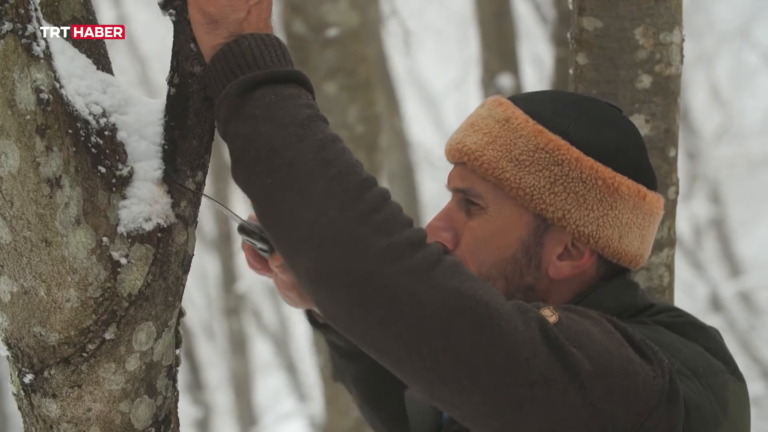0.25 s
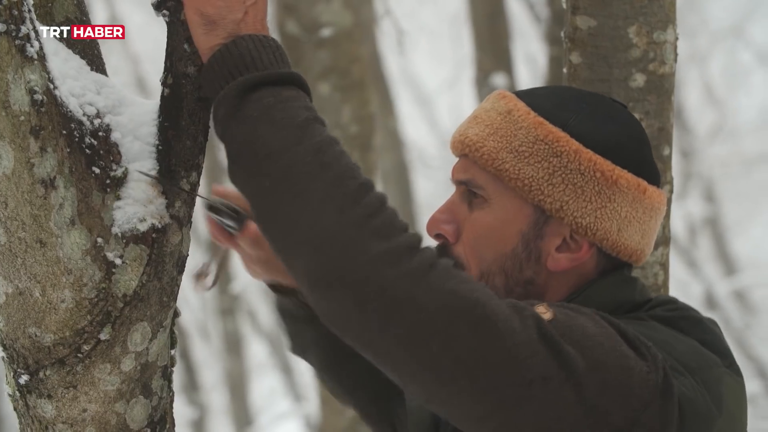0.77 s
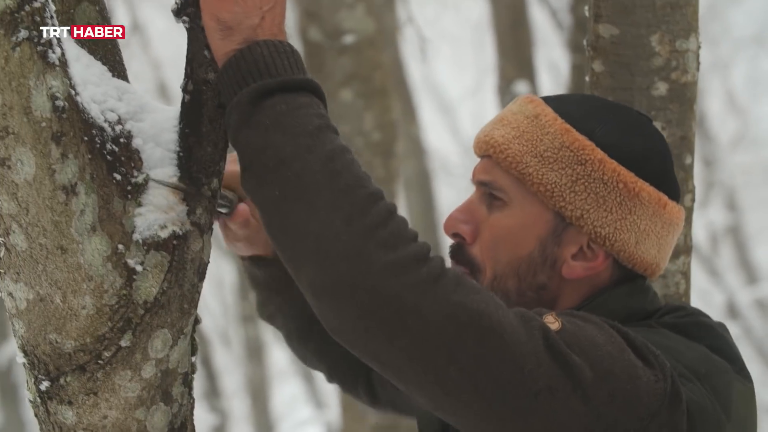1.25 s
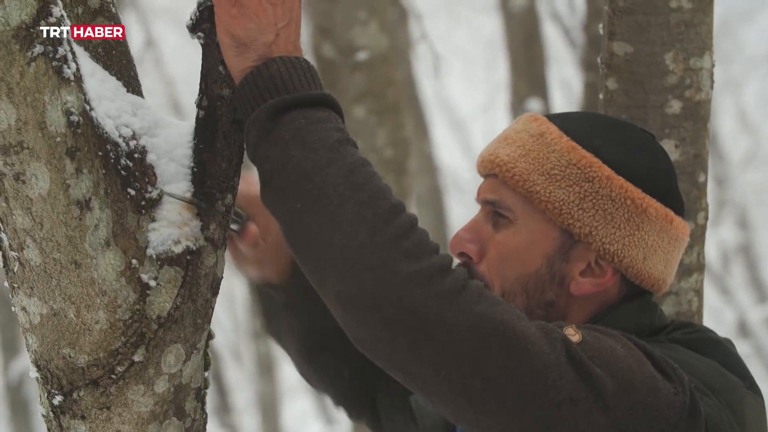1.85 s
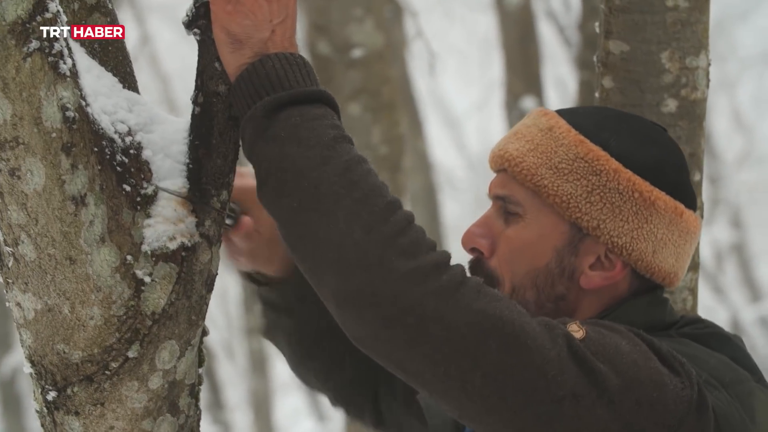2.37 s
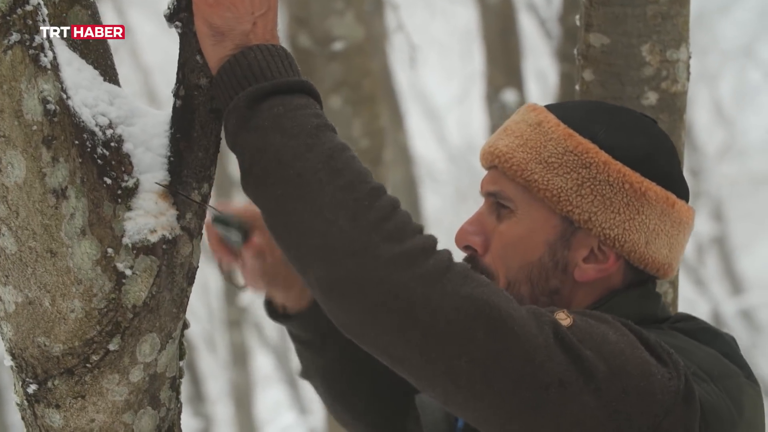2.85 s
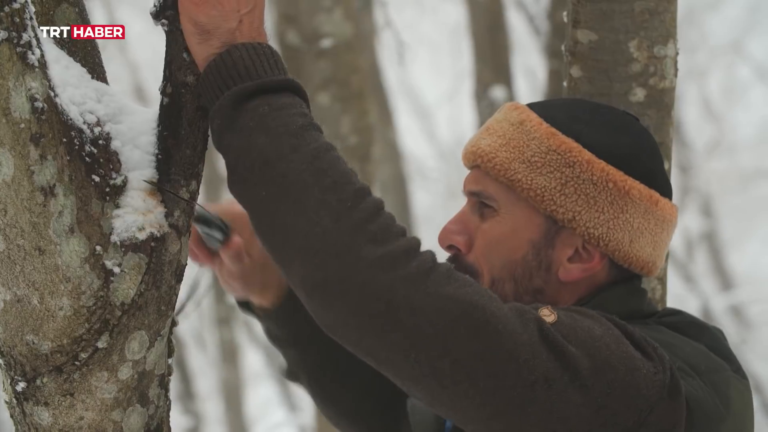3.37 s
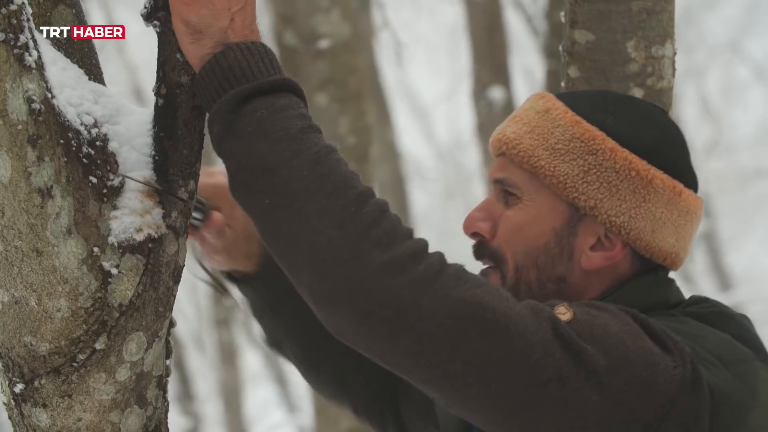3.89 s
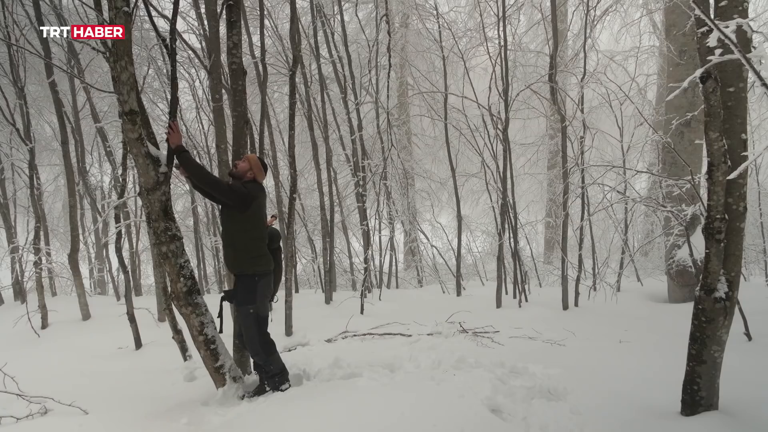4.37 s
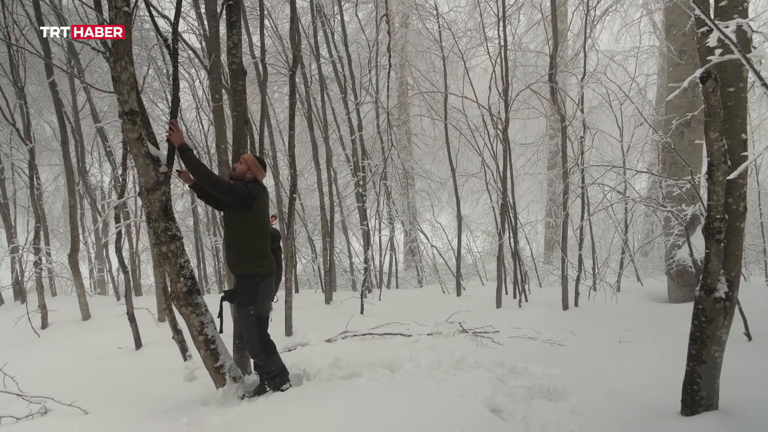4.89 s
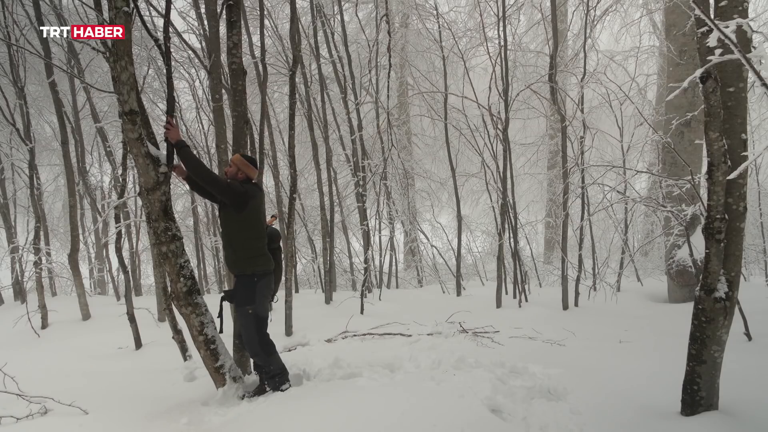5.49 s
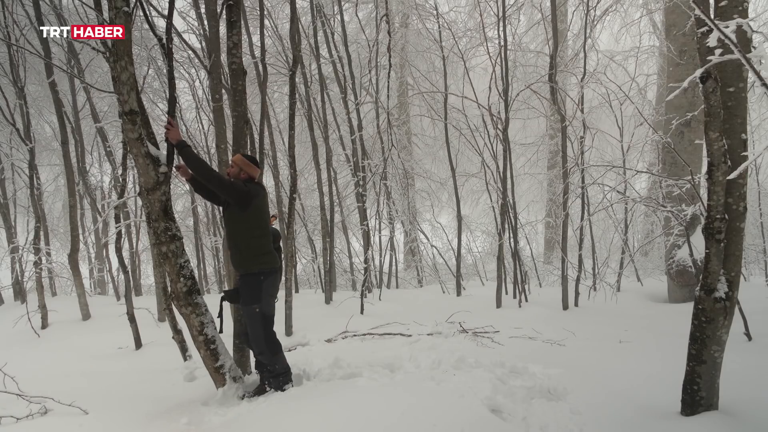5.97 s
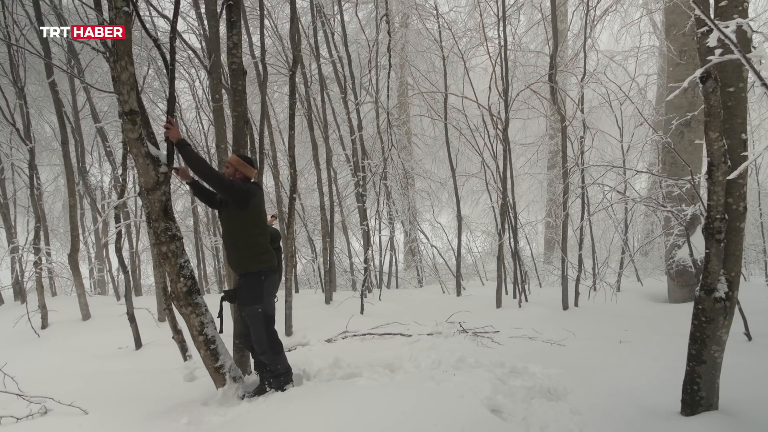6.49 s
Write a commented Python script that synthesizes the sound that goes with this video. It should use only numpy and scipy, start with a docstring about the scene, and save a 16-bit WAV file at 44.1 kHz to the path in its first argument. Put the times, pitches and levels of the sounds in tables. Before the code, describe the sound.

Close and dry in a hushed snowy forest, a folding hand saw is already cutting a dead branch at 0 s, about seven strokes a second. Each stroke swells and brakes in a gritty, toothy rasp; pushes are brighter, pulls bring out more of the hollow branch and trunk. Snaps and a dull knock come at 0.1-0.2 s. Short singing blade tones climb higher after 1.4 s, and soft knocks recur. Around 3.1-3.7 s strokes grow stronger, with sharp cracks and a brief throaty groan at 3.4 s as the blade binds. Sawing fades by 4.3 s into sleeve rustle, light knocks and ticks. At 5.2-5.7 s a knock cluster and bright scratch accompany four lighter, duller strokes. Another rustling pause has small snaps and knocks, then faint strokes from 6.4 s and a hard crack near 6.7 s. Air stays barely audible, without echo.

```python
"""A folding hand saw cuts a dead branch over a faint air floor and rubbing sleeves, dry and close.
From the start about seven strokes a second: teeth tear fibres at a rate set by blade speed, which rings
blade, branch and trunk, the trunk more on the pull. The blade sings, fibres snap, the hand knocks the wood.
Past 3 s the blade binds once and groans. Two pauses follow, with knocks, snaps and rustle, each ended by
a few lighter, duller strokes."""
import sys
import numpy as np
from scipy import signal
from scipy.fft import rfft, irfft
from scipy.io import wavfile
from scipy.ndimage import uniform_filter1d

SR = 44100
rng = np.random.default_rng(int(sys.argv[2]) if len(sys.argv) > 2 else 0)


def transcribe(u):
    """Save the signal u as a 16-bit wav file named by the first command-line argument.

    u: samples, shape (n,) or (channels, n), limited to [-1, 1]; the rate is SR.
    q: integer samples, one column per channel.
    """
    v = np.clip(np.atleast_2d(u).T, -1, 1)
    q = np.round(v * 32767).astype(np.int16)
    wavfile.write(sys.argv[1], SR, q)


N = 297234

# Low resonances of the shaken wood. Each row: centre in Hz, width in Hz, relative level in dB.
RUMBLE = [(60.6, 137, -2.5), (140, 46, 3.5)]


def amp(db):
    """dB to gain."""
    return 10 ** (np.asarray(db) / 20)


def rms_one(x):
    """Scale to unit rms."""
    return x / np.sqrt(np.mean(x ** 2) + 1e-20)


def in_time(rows):
    """Columns of a curve (time in s first), one value a sample."""
    s, *columns = np.transpose(rows)
    return [np.interp(np.arange(N) / SR, s, column) for column in columns]


def drift(rate_hz):
    """Slow random curve of unit rms: noise through two equal poles at a 20th of the sample rate."""
    r = np.exp(-40 * np.pi * rate_hz / SR)
    noise = rng.standard_normal(N // 20 + 2002)
    slow = signal.lfilter([1], [1, -2 * r, r * r], noise)[2000:]  # settled part
    return np.interp(np.arange(N) / 20, np.arange(len(slow)), rms_one(slow))


def resonance(x, hz, width_hz):
    """Two-pole peak with gain 1 on top."""
    r = np.exp(-np.pi * width_hz / SR)
    zeros = [(1 - r * r) / 2, 0, (r * r - 1) / 2]
    poles = [1, -2 * r * np.cos(2 * np.pi * hz / SR), r * r]
    return signal.lfilter(zeros, poles, x + 1e-18)


def body(x, modes, patchy_db=0):
    """Modes in parallel, signs alternating, each wavering on its own as the contact moves."""
    out = 0
    for k, (hz, width_hz, db) in enumerate(modes):
        gain = amp(db + patchy_db * drift(18.4))
        out = out + (-1) ** k * gain * resonance(x, hz, width_hz)
    return out


def grains(per_s, spread_db, hiss):
    """Random clicks of uneven size on a bed of finer tearing, power evened against the rate."""
    sizes = amp(spread_db * np.minimum(rng.exponential(1, N), 3)) * rng.choice([-1, 1], N)
    clicks = rms_one(sizes) * (rng.random(N) < per_s / SR) * np.sqrt(SR / per_s)
    return clicks + hiss * rng.standard_normal(N)


def bent(x, depth, rate_hz):
    """Pitch wanders by a small share as the grip on the wood shifts."""
    pace = 1 + depth * drift(rate_hz)
    shift_samples = np.cumsum(pace - uniform_filter1d(pace, size=8000))
    return np.interp(np.arange(N) + shift_samples, np.arange(N), x)


def air():
    """Steady faint floor: noise shaped by a curve over log frequency."""
    # Each row: frequency in Hz, relative level in dB.
    spectrum = [(25, -23), (130, -1.5), (500, 10), (900, 0), (2000, -12), (6000, -18), (11000, -30),
                (15000, -3)]
    at_hz, db = np.transpose(spectrum)
    hz = np.fft.rfftfreq(N, 1 / SR) + 1  # +1 keeps the log finite
    gain = amp(np.interp(np.log(hz), np.log(at_hz), db))
    return amp(-72) * rms_one(irfft(rfft(rng.standard_normal(N)) * gain, N))


def rustle():
    """Sleeves and bark: crumbly rub of clumped grains, fine bright scratch, low rumble of shaken wood."""
    # Each row: time in seconds, dull rub in dB, bright scratch in dB before flicker, rumble in dB.
    rub_levels = [(0, -62.5, -68, -63), (.23, -57, -65.5, -65.5), (.56, -61, -67, -69.5),
                  (3.3, -59.5, -69, -69), (3.63, -52.5, -64, -69), (3.8, -58, -68, -73),
                  (4.3, -57.5, -71, -78), (4.37, -62.5, -71.5, -75), (4.66, -61, -70.5, -74),
                  (4.78, -71, -73, -90), (5.11, -64, -69.5, -90), (5.17, -59, -67, -81),
                  (5.284, -47.5, -86, -65), (5.37, -57, -51.5, -66), (5.45, -59.5, -68.5, -79),
                  (5.74, -58.5, -72.5, -73), (5.78, -65, -67, -70), (5.85, -60, -68.5, -76),
                  (6.05, -60.5, -69.5, -74), (6.13, -58, -69, -72), (6.25, -62.5, -70, -70),
                  (6.62, -62.5, -71, -75)]
    # Each row: centre in Hz, width in Hz, relative level in dB.
    sleeve_modes = [(196, 226, -4.5), (374, 290, -1), (528, 290, -1.5), (940, 670, -6), (1350, 2100, -10)]
    dull_db, bright_db, rumble_db = in_time(rub_levels)

    crumbs = grains(250 * amp(3 * drift(12)), spread_db=3.5, hiss=1.8) * amp(1.5 * drift(20))
    soft_crumbs = signal.lfilter([.2], [1, -.8], crumbs)
    dull = rms_one(body(soft_crumbs, sleeve_modes, 2.1)) * amp(dull_db)

    specks = grains(120, spread_db=6.0, hiss=3.0)
    flicker_db = 1.0 * drift(30)
    bright_band = signal.butter(2, [2000, 10500], "band", fs=SR, output="sos")
    bright = rms_one(signal.sosfilt(bright_band, specks)) * amp(bright_db + flicker_db)

    rumble = rms_one(body(rng.standard_normal(N), RUMBLE, 1.2)) * amp(rumble_db)
    return dull + bright + rumble


def saw():
    """Each stroke speeds up and brakes; pressure follows speed, steeply for the blade, gently for the wood."""
    # Push and pull in turn. Each row: top speed at in seconds, rise in s, fall in s,
    # blade level in dB before trim and crest, branch ring relative to blade in dB.
    strokes = [(0.025, 0.17, 0.04, -49.5, 0.5), (0.157, 0.089, 0.033, -45, -1),
               (0.298, 0.1, 0.056, -46, -2.5), (0.433, 0.081, 0.049, -46, -3),
               (0.581, 0.087, 0.045, -49.5, -1), (0.718, 0.083, 0.046, -47.5, 0.5),
               (0.88, 0.1, 0.039, -48.5, -0.5), (1.005, 0.082, 0.048, -47.5, 1),
               (1.159, 0.11, 0.034, -48, 0), (1.293, 0.089, 0.043, -45, -1.5),
               (1.448, 0.1, 0.044, -45.5, -1.3), (1.576, 0.072, 0.058, -42.5, -1.2),
               (1.739, 0.095, 0.039, -47.5, 2.5), (1.864, 0.074, 0.045, -45, -1),
               (2.017, 0.096, 0.038, -45.5, 0.5), (2.147, 0.079, 0.053, -44, -0.9),
               (2.305, 0.082, 0.04, -45.5, 0.5), (2.421, 0.057, 0.06, -45, -0.5),
               (2.583, 0.087, 0.047, -44.5, -1.5), (2.711, 0.073, 0.061, -45, 0.5),
               (2.884, 0.094, 0.027, -45, -1), (3.004, 0.075, 0.049, -45, 1),
               (3.171, 0.11, 0.023, -46, 0.1), (3.296, 0.094, 0.038, -44.5, -1),
               (3.45, 0.088, 0.027, -46, 0.1), (3.577, 0.077, 0.04, -40, -2.5),
               (3.719, 0.058, 0.054, -43.5, -0.5), (3.864, 0.081, 0.051, -41.5, -1),
               (4.003, 0.069, 0.045, -46, -2), (4.155, 0.076, 0.055, -52.5, -2),
               (4.28, 0.048, 0.088, -58.5, 0), (5.255, 0.091, 0.024, -47, -11.5),
               (5.402, 0.19, 0.034, -52, -1), (5.561, 0.1, 0.05, -46.5, -6.5),
               (5.683, 0.074, 0.043, -47.5, -6.5), (6.385, 0.061, 0.12, -57.5, -12.5),
               (6.586, 0.18, 0.041, -61.5, -0.7), (6.654, 0.02, 0.11, -51.5, -6.5)]
    # Resonances of each part. Each row: centre in Hz, width in Hz, relative level in dB.
    blade_modes = [(1850, 100, -10), (2763, 446, 6.5), (3594, 970, 10.5), (4620, 2070, 8.5)]
    edge_modes = [(6840, 960, 6.94), (7800, 1380, 1)]
    branch_modes = [(1234, 173, -4), (1409, 100, -1.5), (1533, 72, 3.5), (1642, 140, -4.5),
                    (1850, 114, -8.5)]
    trunk_modes = [(336, 17, 0.5), (484, 133, -3), (690, 132, -1), (791, 51, 2), (980, 147, -3)]
    sawdust_modes = [(10220, 2600, -9.5), (10990, 1350, -5), (12900, 5500, -17)]

    # (push, pull): trunk and rumble relative to branch ring; branch swell over one stroke length
    trunk_rel_db, rumble_rel_db, branch_swell_db = (-10.5, -4), (-26, -17.5), (-4.5, 14)
    branch_steepness = (0.86, 1.0)  # the branch catches at once on the push
    edge_rel_db, dust_rel_db = -2.5, -6.5  # relative to blade, before trims
    dust_follows, mean_stroke_db = 0.79, -45  # hiss takes this share of the stroke-to-stroke swing
    # after the first pause the strokes are lighter and duller
    late_s, late_edge_db, late_dust_db, late_trunk_db, late_swell_share = 4.5, -3, -5.5, 8, 0

    # rows of all six: blade, edge, branch, trunk, sawdust, rumble
    steepness = np.array([[1.3], [1.3], [0], [1.05], [1.3], [1.05]])  # branch set per stroke
    crest_db = np.array([[5.0], [5.0], [1.5], [2.5], [4.0], [2.5]])  # bite lost away from top speed
    trims_db = [1.08, 2.3, 0.11, 0.25, 1.8, 0]

    t, speed, levels = np.arange(N) / SR, np.zeros(N), np.zeros((6, N))
    for k, (s, rise_s, fall_s, blade_db, wood_db) in enumerate(strokes):
        pull, late = k % 2, s > late_s
        now = slice(max(int((s - rise_s) * SR), 0), int((s + fall_s) * SR))
        since = t[now] - s
        away = np.clip(np.where(since < 0, -since / rise_s, since / fall_s), 0, 1)
        stroke = np.cos(np.pi / 2 * away)
        speed[now] = np.maximum(speed[now], stroke)

        edge_db = edge_rel_db + late * late_edge_db
        trunk_db = wood_db + trunk_rel_db[pull] + late * late_trunk_db
        dust_db = dust_rel_db + (dust_follows - 1) * (blade_db - mean_stroke_db) + late * late_dust_db
        rumble_db = wood_db + rumble_rel_db[pull]
        relative_db = np.array([0, edge_db, wood_db, trunk_db, dust_db, rumble_db])[:, None]

        steepness[2] = branch_steepness[pull]
        shapes = amp(blade_db + relative_db - crest_db * away) * stroke ** steepness
        swell_db = branch_swell_db[pull] * (late_swell_share if late else 1)
        shapes[2] *= amp(swell_db * (since + 0.018) / (rise_s + fall_s))
        levels[:, now] += shapes

    bites = grains(900 * (0.41 + speed), spread_db=3.0, hiss=1.61)  # 369 to 1269 bites a second
    chatter = amp(1.05 * drift(54))  # the teeth dig in unevenly
    branch = bent(body(bites, branch_modes, 1.5), depth=.03, rate_hz=8)
    blade = body(bites, blade_modes, 1.2)
    edge = body(bites, edge_modes, 1.63)
    trunk = body(bites, trunk_modes, 1.5)
    sawdust = body(bites, sawdust_modes, 1.35)
    rumble = body(bites, RUMBLE, 1.1)
    parts = [blade, edge, branch, trunk, sawdust, rumble]
    return chatter * sum(amp(db) * level * rms_one(part) for db, level, part in zip(trims_db, levels, parts))


def singing():
    """Narrow band of tearing noise whose centre glides up as the free length of blade shortens."""
    # Each row: loudest at in seconds, half the span in s, middle pitch in Hz, level in dB before the swell shape.
    notes = [(0.028, 0.034, 2750, -53), (0.309, 0.027, 2800, -53), (0.588, 0.025, 2800, -50),
             (0.886, 0.018, 2750, -47.5), (1.166, .02, 2790, -52), (1.427, 0.068, 4670, -53),
             (1.718, 0.036, 4940, -46.5), (2.004, 0.058, 4070, -50), (2.299, 0.041, 5080, -46.5),
             (2.575, 0.058, 5350, -49), (2.873, 0.038, 5240, -42.5), (3.153, 0.031, 5300, -43.5),
             (3.432, 0.052, 4800, -44.5), (3.56, 0.061, 3590, -48), (3.715, 0.051, 4840, -45.5),
             (3.849, 0.059, 3600, -44.5), (4.297, 0.048, 6000, -63), (5.24, 0.05, 3890, -56),
             (5.374, 0.059, 5100, -54.5), (5.548, 0.059, 3450, -49), (5.674, 0.041, 5750, -50),
             (6.382, 0.066, 3870, -66), (6.665, 0.041, 3780, -51)]
    rise_per_s, pole_width = 1.3, 0.18  # shares of the pitch
    out = np.zeros(N)
    for s, length_s, hz, db in notes:
        u = np.arange(int(2 * length_s * SR)) / (2 * length_s * SR)
        r = np.exp(-np.pi * pole_width * hz / SR)
        noise = rng.standard_normal((2, 16000))
        sway = signal.lfilter([1], [1, -2 * r, r * r], noise)[:, 500:500 + len(u)]
        glide_hz = hz * (1 + rise_per_s * length_s * np.clip(2 * u - 1, -.5, .5))
        phase = 2 * np.pi * np.cumsum(glide_hz) / SR
        tone = rms_one(sway[0] * np.cos(phase) + sway[1] * np.sin(phase))
        start = max(int((s - length_s) * SR), 0)
        out[start:start + len(u)] += amp(db) * np.sin(np.pi * u) ** 2 * tone
    return out


def snaps():
    """Dry fibres snap: a millisecond of crackle, brightest at its own pitch, with a short branch ring."""
    # Each row: start in seconds, crack peak in dB, branch ring relative to crack in dB, brightest in Hz.
    cracks = [(0.085, -36, -15, 6440), (0.175, -33, -1, 4280), (0.2012, -29, -8, 4300),
              (3.0614, -51, -12, 7250), (3.0732, -29, -13, 4500), (3.3317, -26.5, -16, 4800),
              (3.358, -40, -6, 4430), (3.619, -32.5, -19, 5810), (3.6441, -47, -11, 4110),
              (3.6622, -26, 4.5, 4500), (4.4216, -46, -21, 3950), (4.7366, -52.5, 2, 5630),
              (4.893, -45.5, -28, 2680), (5.139, -47, 1, 3020), (5.155, -41.5, -15, 4700),
              (5.741, -40.5, -26, 7600), (5.9692, -41, -26, 4400), (5.9814, -43, -19, 6380),
              (6.005, -51, -11, 2790), (6.209, -49, -32, 2810), (6.6497, -40, -13, 4210),
              (6.6768, -24, -7.5, 3840), (6.6803, -37, 0, 3900), (6.706, -35, -27, 4470)]
    length = 600
    out, t = np.zeros(N + length), np.arange(length) / SR
    broad = signal.butter(2, [1500, 14000], "band", fs=SR, output="sos")
    noises = rng.standard_normal((len(cracks), length))
    for (s, db, ring_db, hz), noise in zip(cracks, noises):
        burst = noise * np.minimum(t / .0007, 1) * np.exp(-t / .001)
        crack = signal.sosfilt(broad, burst) * amp(-10) + resonance(burst, hz, 2500)
        ring = resonance(burst, 1510, 1000)
        snap = crack / np.abs(crack).max() + amp(ring_db) * ring / np.abs(ring).max()
        start = int(s * SR)
        out[start:start + length] += amp(db) * snap
    return out[:N]


def knocks():
    """Soft dull blows on the wood: about one cycle at their own pitch, with a short dying tail."""
    # Each row: envelope peak at in seconds, envelope peak in dB, pitch in Hz.
    blows = [(0.1756, -27.5, 523), (1.328, -36, 420), (1.9005, -34.5, 640), (2.6991, -44, 730),
             (3.098, -37, 676), (3.6066, -27.5, 465), (4.1248, -31.5, 473), (4.4272, -43.5, 416),
             (4.465, -51, 605), (4.5877, -45, 397), (4.6193, -50, 730), (4.7369, -46.5, 990),
             (4.7972, -49, 426), (5.2735, -32.5, 415), (5.2797, -39, 320), (5.297, -33, 617),
             (5.3083, -37, 510), (5.337, -37, 450), (6.095, -42.5, 490), (6.1448, -38.5, 504),
             (6.2217, -45.5, 510), (6.267, -47, 205), (6.47, -43.5, 466), (6.5177, -46, 563)]
    out, t = np.zeros(N), np.arange(-200, 1000) / SR
    for s, db, hz in blows:
        cycles = t * hz
        shape = np.where(cycles < 0, np.exp(-(cycles / 0.43) ** 2), np.exp(-cycles / 0.48))
        middle = int(s * SR)
        out[middle - 200:middle + 1000] += amp(db) * shape * np.sin(2 * np.pi * cycles)
    return out


def groan():
    """The blade binds and slips: slips start fast, settle, repeat unevenly; noise near 460 Hz is the trunk."""
    start_s, attack_s, hold_s, release_s, gain_db = 3.378, 0.018, 0.028, 0.028, -35.5
    slips_per_s, first_slips_per_s, settle_s = 610, 900, 0.00807  # mean rates, before the wander
    since = np.arange(N) / SR - start_s
    per_s = slips_per_s + (first_slips_per_s - slips_per_s) * np.exp(-np.abs(since) / settle_s)
    phase = 2 * np.pi * np.cumsum(per_s * (1 + .06 * drift(91))) / SR
    corners_s = np.cumsum([0, attack_s, hold_s, release_s])
    binding = np.interp(since, corners_s, [0, 1, 1, 0]) ** 2
    shake = rms_one(resonance(rng.standard_normal(N), 460, 410))
    uneven = amp(1.5 * drift(120))  # slips stronger or weaker
    slips = 1.74 * np.sin(phase) + 0.11 * np.sin(2 * phase)
    return binding * uneven * amp(gain_db) * (slips + 0.66 * shake)


def scene():
    """All sources summed to one channel, close and dry: snow swallows the echoes."""
    return (saw() + singing() + snaps() + knocks() + groan() + rustle() + air())[None]


def record(dry):
    """Steep elliptic low-pass cuts the top."""
    low_pass = signal.ellip(12, .3, 55, 15720, fs=SR, output="sos")  # ripple dB, stop dB, cutoff Hz
    return signal.sosfilt(low_pass, dry)


dry = scene()
out = record(dry)
transcribe(out)
```